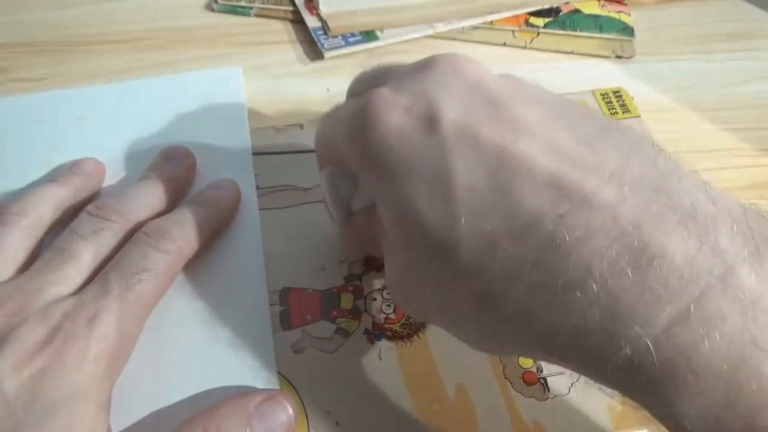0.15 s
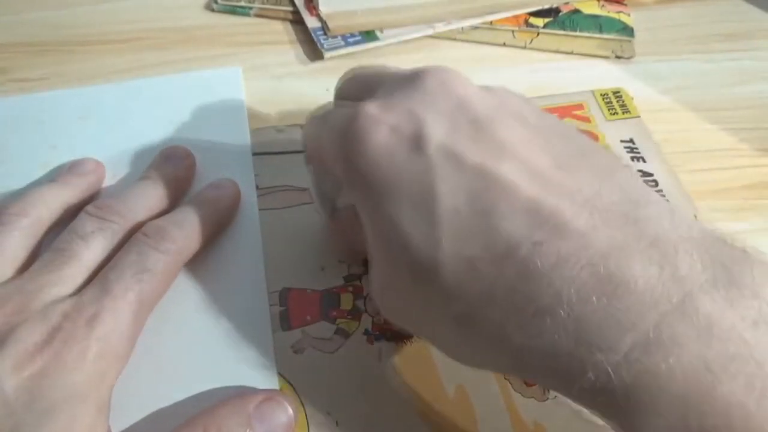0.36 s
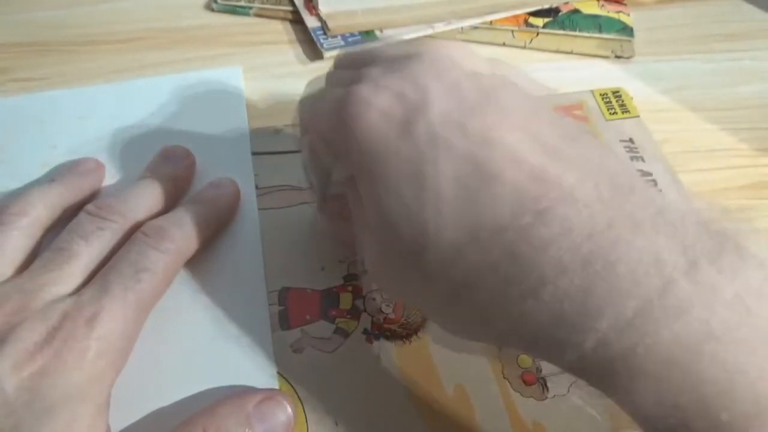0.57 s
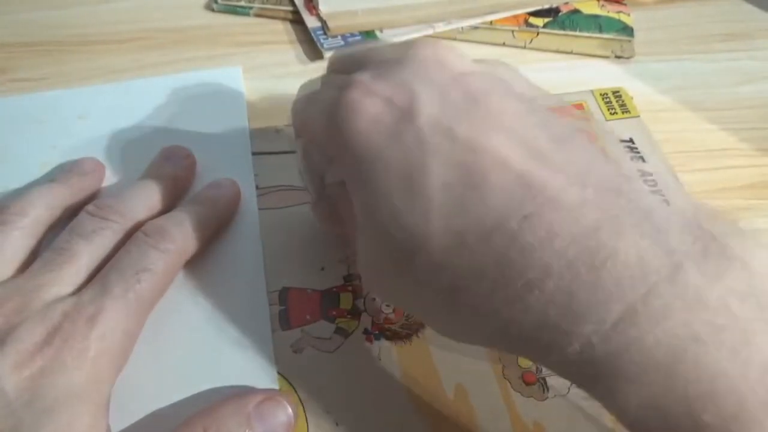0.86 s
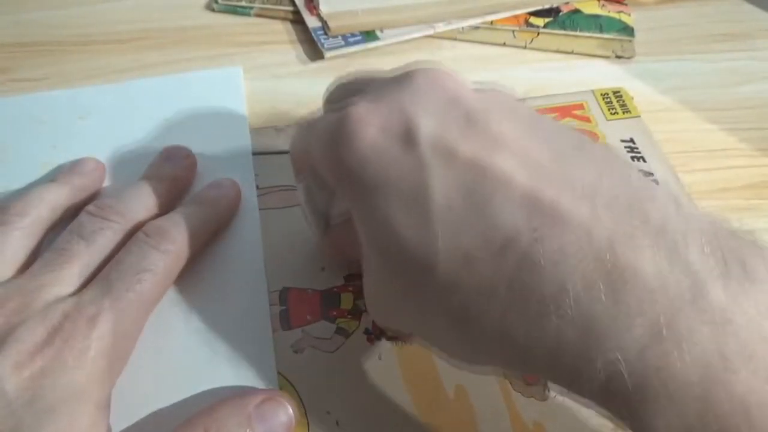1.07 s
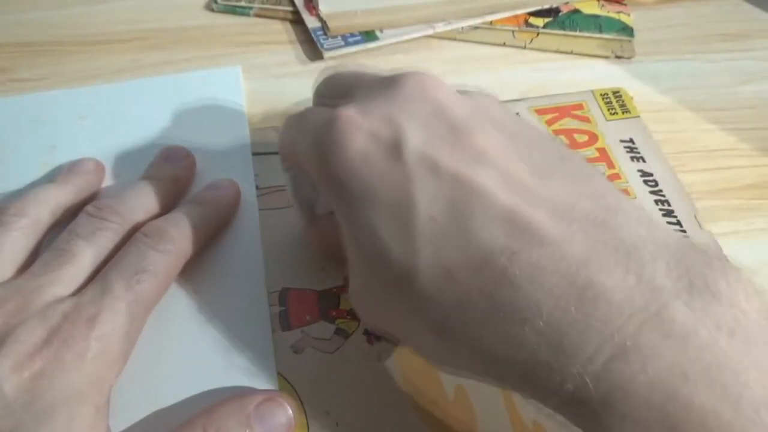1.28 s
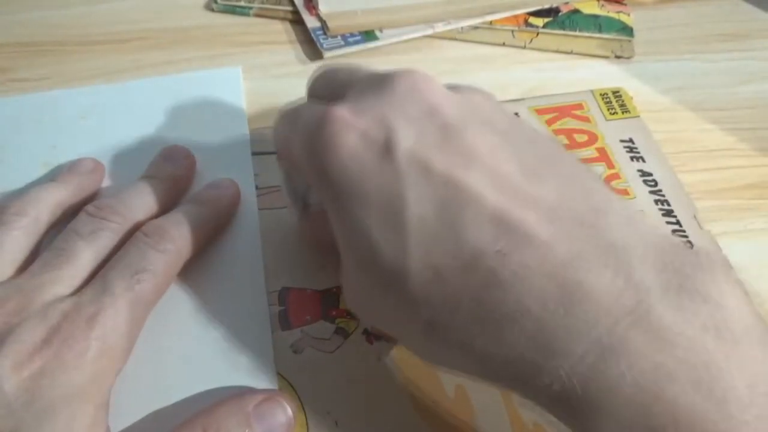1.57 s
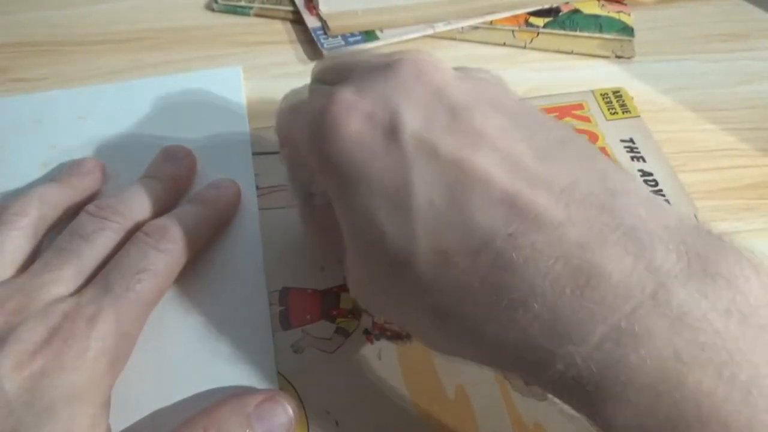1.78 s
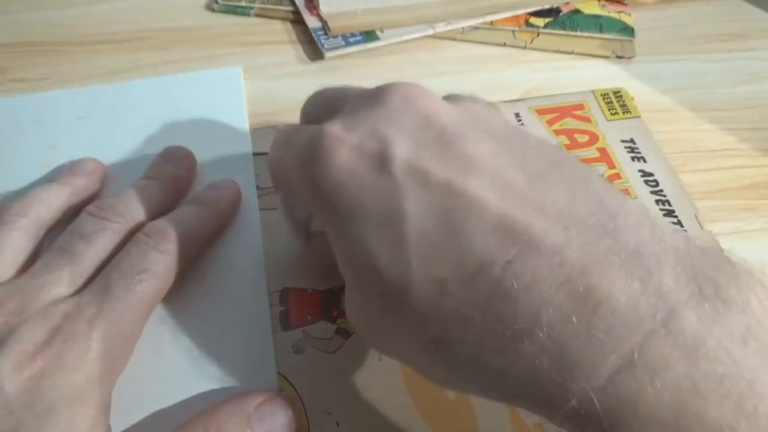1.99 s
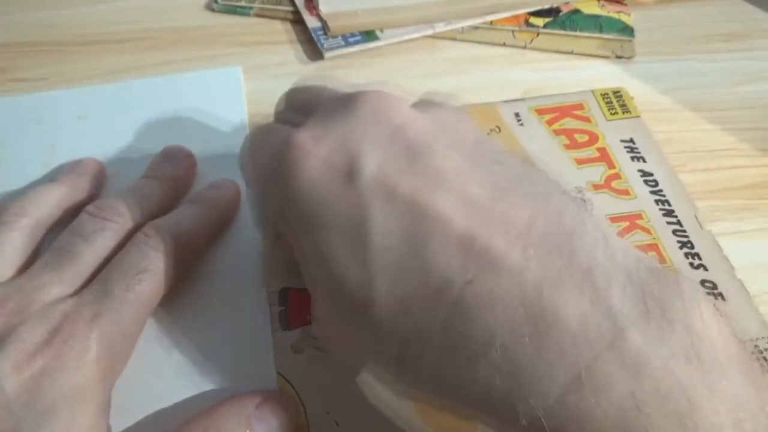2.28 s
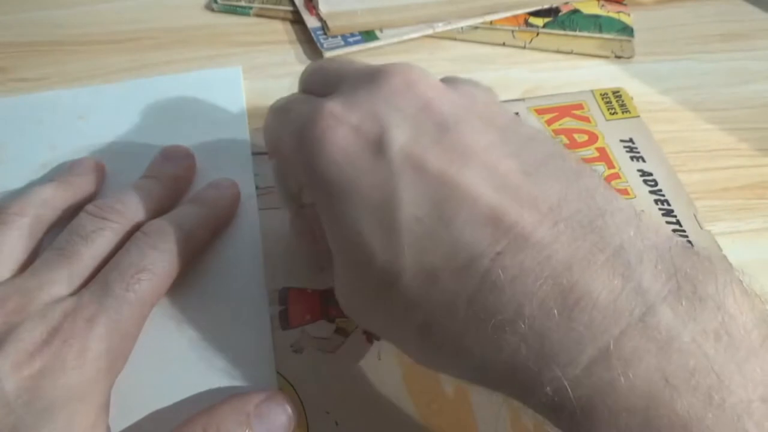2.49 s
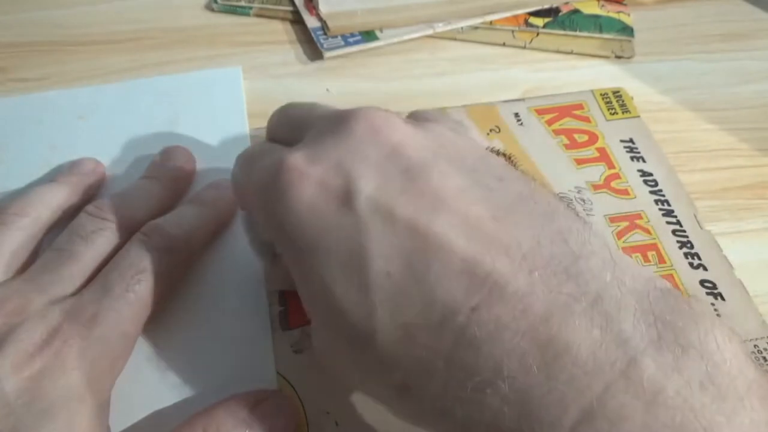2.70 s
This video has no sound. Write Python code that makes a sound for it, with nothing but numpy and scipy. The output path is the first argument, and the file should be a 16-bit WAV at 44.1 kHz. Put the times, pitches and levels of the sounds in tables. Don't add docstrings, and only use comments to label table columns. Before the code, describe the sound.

Close stereo sound of a rubber eraser scrubbing paper on a wooden table: a light scuff, an abrupt bright scratch, a lifting scuff, repeated evenly, with low thumps, tiny snaps, faint room hum and electronic buzz.

```python
import sys
import numpy as np
from scipy import signal
from scipy.fft import rfft, irfft, next_fast_len
from scipy.io import wavfile
from scipy.ndimage import uniform_filter1d, map_coordinates

SR = 44100
rng = np.random.default_rng(int(sys.argv[2]) if len(sys.argv) > 2 else 0)


def output_pcm(signal):
    pcm = np.clip(np.atleast_2d(signal).T, -1, 1) * 32767
    wavfile.write(sys.argv[1], SR, np.round(pcm).astype(np.int16))


def field_ratio(decibels):
    return 10 ** (np.asarray(decibels, dtype=float) / 20)


N = 125685


def unit(x):
    return x / np.sqrt(np.mean(x ** 2) + 1e-20)


def along(points, hz):
    f, v = np.transpose(points)
    return np.interp(np.log(hz + 1), np.log(f + 1), v)


def peaks(table, hz):
    return sum(db / (1 + (2 * (hz - centre) / width) ** 2) for centre, width, db in table)


def filtered(x, response):
    m = next_fast_len(N + SR // 2)
    return irfft(rfft(x, m) * response(np.fft.rfftfreq(m, 1 / SR)), m)[..., :N]


def wobble(rate_hz):
    knots = rng.standard_normal(int(N * 400 / SR))
    return map_coordinates(knots, [np.arange(N) * rate_hz / SR])


def knee(x, rounding):
    return rounding * np.logaddexp(0, x / rounding)


def pair(source, gain, alike, patchy_db):
    z = signal.stft(source, nperseg=512)[2]
    field = rng.standard_normal(z.shape[1:])
    field = uniform_filter1d(field, size=5, axis=0)
    field = uniform_filter1d(field, size=8, axis=1)
    two = signal.istft(z * field_ratio(patchy_db * unit(field)), nperseg=512)[1][:, :N]

    def mid_side(hz):
        turn = np.arccos(np.clip(along(alike, hz), -1, 1)) / 2
        return gain(hz) * [np.cos(turn), np.sin(turn)]

    mid, side = filtered(two, mid_side)
    return unit(np.array([mid + side, mid - side]))


# freq_hz, density_db (dB per Hz)
HUM_SPECTRUM = [(15, -38), (25, 0.5), (162, -2.5), (374, -7.5), (436, -8), (522, -9), (592, -12),
                (653, -33), (700, -11), (910, -37), (1540, -120)]
# centre_hz, width_hz, level_db
DRONES = [(47, 6.1, -1), (141, 33, 3.5), (223.6, 14, 6), (311, 11, 4)]
# freq_hz, density_db (dB per Hz)
AIR_SPECTRUM = [(400, -4.5), (700, 5), (1400, 2), (2200, -0.5), (4000, -5.5), (7200, -8), (7850, -3.5),
                (8500, -10)]
# freq_hz, likeness (share)
ROOM_LIKENESS = [(30, .99), (60, 0.94), (130, 0.98), (270, 0.76), (570, 0.25), (1220, 0.17), (2580, 0.12),
                 (5470, 0.56), (11600, 0.66)]


def quiet():
    def noise():
        return rng.standard_normal((2, N))

    hum = pair(noise(), lambda hz: field_ratio(along(HUM_SPECTRUM, hz) + peaks(DRONES, hz)), ROOM_LIKENESS, patchy_db=1.0)
    air = pair(noise(), lambda hz: field_ratio(along(AIR_SPECTRUM, hz)), ROOM_LIKENESS, patchy_db=1.6)
    return field_ratio(-58.5) * hum + field_ratio(-58) * air


# delay_s, half_width_s, peak_db, phase_turns, even_frame_extra_db
BLIPS = [(-0.0025, 0.0024, -63.5, 0.054, 5), (0.0064, 0.0045, -57, 0.011, -1.2),
         (0.001, 0.004, -66, 0.0052, -.8)]
BLIP_PITCHES = [2982, 2952, 2652]


def buzz():
    t = np.arange(N) / SR
    frame_rate_hz, right_db = 30, 3.1
    blips = 0
    for hz, (delay, half_width, db, turns, even_db) in zip(BLIP_PITCHES, BLIPS):
        frame = (t - delay) * frame_rate_hz
        off_s = ((frame + .5) % 1 - .5) / frame_rate_hz
        level_db = db + even_db * np.cos(np.pi * frame) - 6.4 * (off_s / half_width) ** 2 + 2.8 * wobble(39.2)
        blips = blips + field_ratio(level_db) * np.sin(2 * np.pi * (hz * t + turns) + .5 * wobble(110))
    return blips * field_ratio(np.array([[-right_db], [right_db]]))


# start_s, peak_db, pitch_hz, t60_s
THUMPS = [(0.002, -43, 51.4, 0.098), (0.054, -47, 44, 0.27), (0.325, -47, 52, 0.11), (0.36, -51, 38, .2),
          (0.642, -43.5, 62, 0.13), (0.691, -44.5, 44.6, 0.23), (0.942, -43, 54.6, .1),
          (0.99, -47.5, 47.8, 0.27), (1.25, -40.5, 51.7, 0.086), (1.3, -48, 49.7, 0.2),
          (1.575, -42, 38, 0.088), (1.62, -46.5, 48, 0.18), (1.888, -47, 45, .12), (1.925, -50, 44, 0.2),
          (2.229, -45, 45, 0.12), (2.27, -51, 45.6, 0.4), (2.62, -57, 40, .2), (2.68, -52.5, 52.5, 0.15),
          (2.74, -53, 42, .12)]
# start_s, level_db, pitch_hz, t60_s
KNOCKS = [(0.04, -55, 145, .08), (0.242, -44.5, 134, 0.12), (0.292, -45, 139, 0.1), (0.39, -49, 164, 0.089),
          (0.53, -55, 216, 0.13), (0.659, -55, 300, 0.14), (1.584, -49, 275, 0.12), (1.625, -52, 309, 0.15),
          (1.59, -58.5, 548, 0.4), (1.59, -48, 129, .1), (1.765, -49, 135, 0.066), (2.005, -55, 215, .08)]


def table():
    out, t = np.zeros(N + SR), np.arange(SR // 3) / SR
    rise_s, climb_per_s = 0.014, 2.8
    soft = 1 - np.exp(-t / rise_s)
    for rows, bend in ((THUMPS, .93 + climb_per_s * t / 2), (KNOCKS, 1)):
        for start, db, hz, t60 in rows:
            ring = np.sin(2 * np.pi * hz * t * bend)
            out[round(start * SR):][:len(t)] += field_ratio(db + 4.5 - 60 * t / t60) * ring * soft
    return out[:N]


def slips(share, spread_db):
    ticks = rng.random((2, N)) < share
    return unit(ticks * rng.standard_normal((2, N)) * field_ratio(spread_db * rng.standard_normal((2, N))))


# centre_hz, width_hz, level_db
SHEET_MODES = [(1380, 310, 3), (2000, 40, 6), (2046, 260, 0), (2706, 82, -12), (3020, 320, 2),
               (3400, 72, -7), (4170, 300, 0.5), (5570, 300, 0.5), (5750, 440, -3), (6200, 76, 2.5),
               (7000, 160, 4.5), (8750, 350, -3.5), (9800, 300, 3.5), (9900, 150, -1)]


def sheet(spectrum):
    return lambda hz: field_ratio(along(spectrum, hz) + peaks(SHEET_MODES, hz))


# freq_hz, likeness (share)
RUB_LIKENESS = [(500, 0.89), (1200, 0.92), (2600, 0.98), (5500, 0.92), (11000, 0.99)]


def rubbed(share, spread_db, gain, patchy_db):
    return pair(slips(share, spread_db), gain, RUB_LIKENESS, patchy_db)


# peak_s, half_width_s, level_db, rise_share (rise time over half width)
TOUCHES = [
    (0.02, 0.0059, -50.5, 1),
    (0.344, 0.013, -54.5, 1.15),
    (0.662, 0.0091, -48.5, 1.06),
    (0.962, 0.012, -49.1, 1.15),
    (1.272, 0.0093, -44.5, 0.56),
    (1.596, 0.009, -46.5, 1.15),
    (1.911, 0.016, -49, 1.1),
    (2.254, 0.015, -44, 1.03),
    (2.615, 0.016, -42, 1.17),
]
# peak_s, half_width_s, level_db, rise_share (rise time over half width)
LIFTS = [
    (0.211, 0.012, -41.5, 1.03),
    (0.53, 0.0096, -46, 1.06),
    (0.833, 0.01, -43, 1.06),
    (1.149, 0.012, -39.5, 0.74),
    (1.463, 0.0086, -42.5, 0.91),
    (1.788, 0.012, -43.5, .93),
    (2.108, 0.013, -40.5, 0.83),
    (2.476, 0.0097, -43.5, 1.2),
    (2.83, 0.016, -40, 0.99),
]
# peak_s, half_width_s, level_db, rise_share (rise time over half width)
GRAZES = [
    (0.649, .005, -59, 0.52),
    (0.946, .005, -58, .6),
    (1.257, 0.0055, -49, 0.53),
    (1.574, .007, -53, .4),
    (2.238, 0.0053, -57, 0.72),
    (2.597, .006, -69, .7),
]


def bells():
    peak_s, half_width_s, db, rise = np.transpose(TOUCHES + LIFTS + GRAZES)[:, :, None]
    t = np.arange(N) / SR
    side_s = half_width_s * np.where(t < peak_s, rise, 2 - rise)
    return field_ratio(db - 7.3 * ((t - peak_s) / side_s) ** 2)


TOUCH_LOW_DB = [-12, -12, -9.5, -6.5, -2.5, -6.5, -9, -11, -8.5]
LIFT_LOW_DB = [-14.5, -15, -12, -13.5, -9, -11, -13, -6, -8.5]
TOUCH_DEEP_DB = [-13, -4.5, -14, -20, -26, -14, -23, -28, -26]
LIFT_DEEP_DB = [-12.5, -23, -13.5, -19, -19, -14.5, -15.5, -12.5, -26]
# freq_hz, density_db (dB per Hz)
SCUFF_SPECTRUM = [(1500, -28), (2400, -19), (2900, 1), (3500, 1.5), (4500, 2), (8000, 0.5), (10000, -3.5),
                  (12000, -6.5)]
LOW_SPECTRUM = [(600, -40), (1000, -19), (1300, -0.5), (1600, 0.5), (2100, 1.5), (2500, -2), (3200, -8),
                (5000, -43)]
DEEP_SPECTRUM = [(350, -37), (600, -3.5), (800, 0.5), (1200, 0), (1500, -22), (2500, -50)]


def scuffs():
    t = np.arange(N) / SR
    rest_db, edge_s = -59.5, 0.011
    rest = 0
    for touch, lift in zip(TOUCHES, LIFTS):
        outside_s = knee(touch[0] - t, edge_s) + knee(t - lift[0], edge_s)
        rest = rest + field_ratio(rest_db - 6 * outside_s / edge_s)
    each = bells()
    top = np.hypot(each.sum(axis=0), rest)
    low = field_ratio(np.array(TOUCH_LOW_DB + LIFT_LOW_DB + [-8.5] * len(GRAZES))) @ each + field_ratio(-6) * rest
    deep = field_ratio(np.array(TOUCH_DEEP_DB + LIFT_DEEP_DB + [-18] * len(GRAZES))) @ each + field_ratio(-5) * rest
    stutter = field_ratio(1.2 * wobble(170))
    return (stutter * top * rubbed(.6, -0.4, sheet(SCUFF_SPECTRUM), patchy_db=0.7)
            + low * rubbed(.6, 2.0, sheet(LOW_SPECTRUM), patchy_db=2.4)
            + deep * rubbed(.6, 0.7, sheet(DEEP_SPECTRUM), patchy_db=1.1))


# grip_s, hold_s (grip to braking), level_db, brake_db_per_s, top_s (grip to top speed)
STROKES = [
    (0.063, 0.1, -31.5, 637.5, 0.059),
    (0.389, 0.11, -31.5, 900, 0.036),
    (0.704, 0.1, -32.5, 1260.0, 0.038),
    (0.999, 0.099, -32, 550.0, 0.044),
    (1.313, 0.12, -32.5, 1088, 0.047),
    (1.628, 0.12, -33, 733, 0.048),
    (1.947, 0.11, -32.5, 580.0, 0.048),
    (2.278, 0.15, -31, 190.0, 0.054),
    (2.626, 0.15, -31.5, 480, 0.065),
]
# low_db, sheen_db, bite_db, sag_db_per_s
PRESS = [(-1, -2.7, -1, 30), (0.3, -1.5, -2, 152), (0, -0.5, 0.3, 30), (0.7, 0.5, .6, 30),
         (1.1, 0, 0.2, 17), (1.3, 0, .1, 21), (0, .1, 2.3, 27.5), (1.4, 2.2, 0.7, 35), (1.1, 1.4, 1.5, 26)]


def drag_level():
    t = np.arange(N) / SR
    grip_db_per_s, grip_round_s, brake_round_s = 1750, .0005, 0.0022
    arch_db_per_s2, sag_lead_s = 981, 0.02
    drag = 0
    for (grip, hold, db, brake, top), (*_, sag) in zip(STROKES, PRESS):
        since = t - grip
        level_db = db - grip_db_per_s * knee(-since, grip_round_s) - arch_db_per_s2 * (since - top) ** 2
        level_db = level_db - brake * knee(since - hold, brake_round_s)
        drag = drag + field_ratio(level_db - sag * knee(since - hold + sag_lead_s, .004))
    return drag


# freq_hz, density_db (dB per Hz)
HISS_SPECTRUM = [(1800, -47), (2600, -17), (2950, -4), (4300, -1.4), (6000, -2.5), (8000, -5),
                 (10800, -3.5), (12000, -15.5)]
CHEST_SHARE = [0.029, 0.013, -0.038, -0.078, -0.066, -0.019, -0.013, 0.34, 0.21]


def hiss(drag, judder, stroke):
    centre_hz, width_hz = 4570, 1800
    rub = drag * judder * rubbed(.8, .8, sheet(HISS_SPECTRUM), patchy_db=0.4)
    chest = filtered(rub, lambda hz: np.exp(-(2 * (hz - centre_hz) / width_hz) ** 2))
    return rub + np.array(CHEST_SHARE)[stroke] * chest


# freq_hz, density_db (dB per Hz)
BODY_SPECTRUM = [(500, -70), (680, -10.5), (800, -5), (1250, -1.5), (1650, 0), (2300, -5.5), (2700, 3.5),
                 (3300, -61)]


def body(drag, since, low_db):
    full = drag.max()
    buckle_db = 3 * np.exp(-np.abs(since) / 0.0083)
    level = field_ratio(-13.5 + low_db + buckle_db) * full * (drag / full) ** .8
    return level * rubbed(.6, 2.3, sheet(BODY_SPECTRUM), patchy_db=1.8)


# freq_hz, density_db (dB per Hz)
SHEEN_SPECTRUM = [(6000, -120), (6800, -43), (7200, -8), (7900, -5.5), (8350, -3.5), (8650, -42),
                  (9500, -120)]


def sheen(drag, judder, since, sheen_db):
    full = drag.max()
    glide_share, glide_s = 0.02, 0.072
    turn = np.pi / 2 * np.clip(since / glide_s, 0, 1)
    low, high = (rubbed(.3, 1.0, lambda hz: field_ratio(along(SHEEN_SPECTRUM, hz / (1 + side * glide_share))), patchy_db=-0.5)
                 for side in (-1, 1))
    level = field_ratio(-5 + sheen_db) * full * (drag / full) ** 1.37
    return level * judder * (np.cos(turn) * low + np.sin(turn) * high)


# freq_hz, density_db (dB per Hz)
BITE_SPECTRUM = [(4500, -62), (6000, -7), (7500, -12), (9000, 13), (10500, -20), (12000, -4)]


def bite(drag, since, bite_db):
    t60_s = 0.37
    level = drag * field_ratio(-7 + 2 * bite_db - 60 * np.clip(since, 0, None) / t60_s)
    return level * rubbed(0.6, 1.5, sheet(BITE_SPECTRUM), patchy_db=2.5)


# start_s, peak_db
SNAPS = [
    (1.0335, -26),
    (1.3977, -19.5),
    (1.5982, -36),
    (1.701, -23),
    (2.251, -31),
    (2.3015, -21),
]


def snaps():
    out, t = np.zeros(N), np.arange(SR // 500) / SR
    pitch_hz, t60_s = 7200, .0012
    for start, db in SNAPS:
        out[round(start * SR):][:len(t)] += field_ratio(db - 60 * t / t60_s) * np.cos(2 * np.pi * pitch_hz * t)
    return out


def eraser():
    t = np.arange(N) / SR
    drag = drag_level()
    judder = field_ratio(.3 * wobble(60) + .5 * wobble(220))
    grips = np.array([row[0] for row in STROKES])
    stroke = np.clip(np.searchsorted(grips, t + .03) - 1, 0, None)
    since = t - grips[stroke]
    low_db, sheen_db, bite_db, _ = np.transpose(PRESS)[:, stroke]
    return (hiss(drag, judder, stroke) + body(drag, since, low_db) + sheen(drag, judder, since, sheen_db)
            + bite(drag, since, bite_db) + scuffs() + snaps())


# time_s, lean (share of the middle that leans left)
DRIFT = [(0, .03), (1.5, 0.064), (2.85, 0.12)]


def leaning(rub):
    top_hz = 6660
    middle = filtered(rub.mean(axis=0), lambda hz: 1 / (1 + (hz / top_hz) ** 8))
    lean = np.interp(np.arange(N) / SR, *np.transpose(DRIFT)) * middle
    return rub + np.array([lean, -lean])


# freq_hz, t60_s
ROOM_DECAY = [(300, 0.2), (2000, 0.45), (10000, 0.3)]


def room(x):
    hz, t, z = signal.stft(rng.standard_normal((2, SR // 2)), SR, nperseg=256)
    fade = field_ratio(-60 * t / along(ROOM_DECAY, hz)[:, None])
    tail = signal.istft(z * fade, SR, nperseg=256)[1]
    return signal.fftconvolve(x, tail / np.linalg.norm(tail[0]), axes=1)[:, :N]


def scene():
    rub = leaning(eraser())
    return rub + field_ratio(-19.5) * room(rub) + table() + quiet() + buzz()


def top_cut(x):
    return signal.sosfilt(signal.butter(12, 11600, fs=SR, output="sos"), x)


def record(dry):
    top_hz, edge_hz = 11012, 28
    mix = filtered(dry, lambda hz: field_ratio(-6 * np.logaddexp(0, (hz - top_hz) / edge_hz)))
    return top_cut(mix)


dry = scene()
out = record(dry)
output_pcm(out)
```